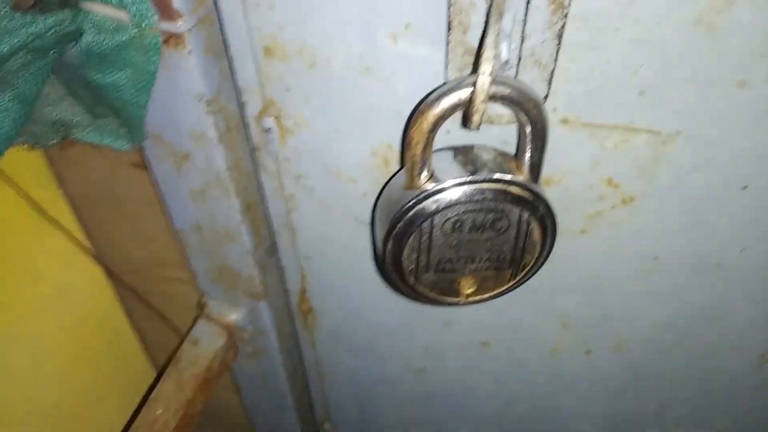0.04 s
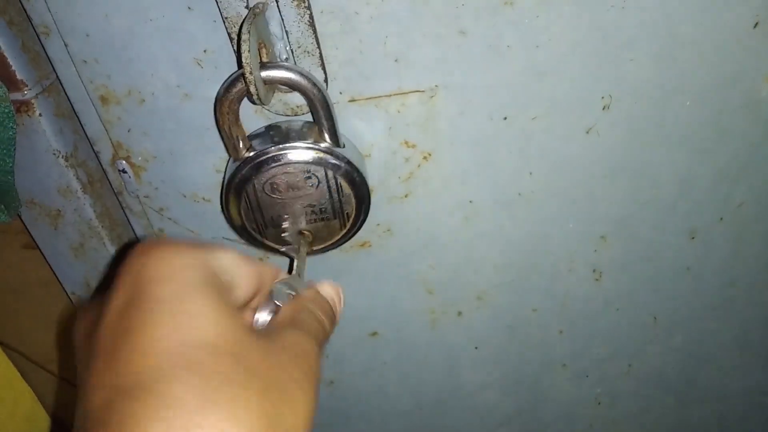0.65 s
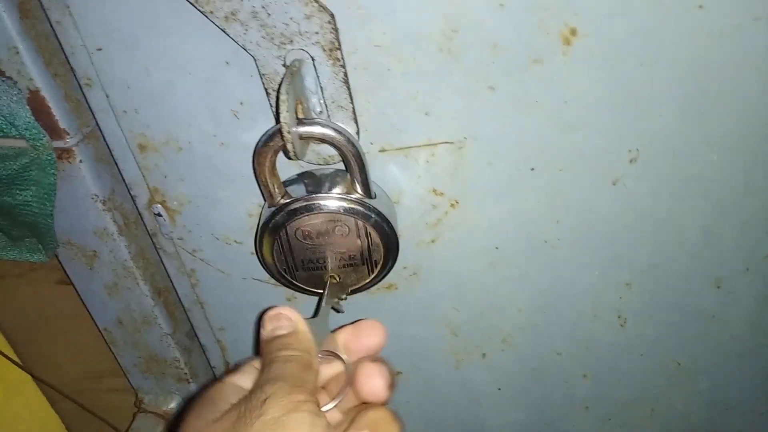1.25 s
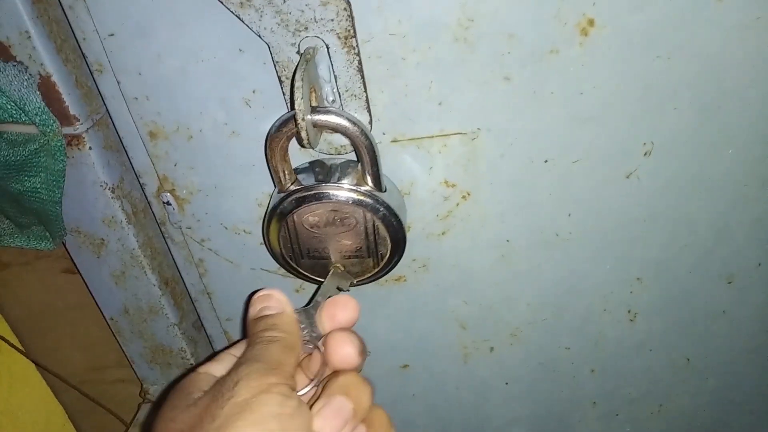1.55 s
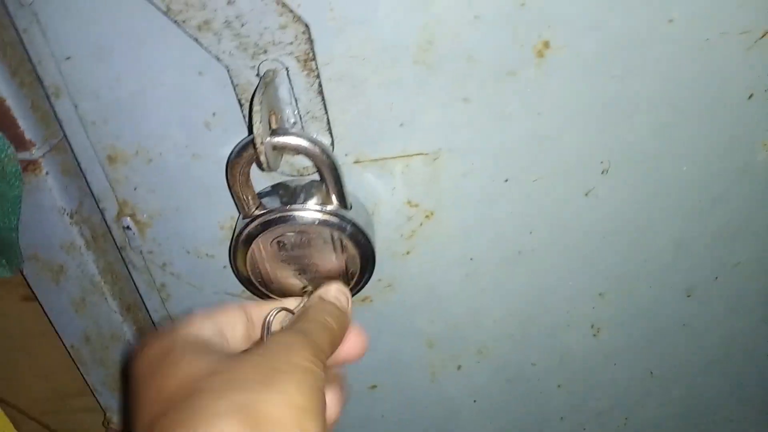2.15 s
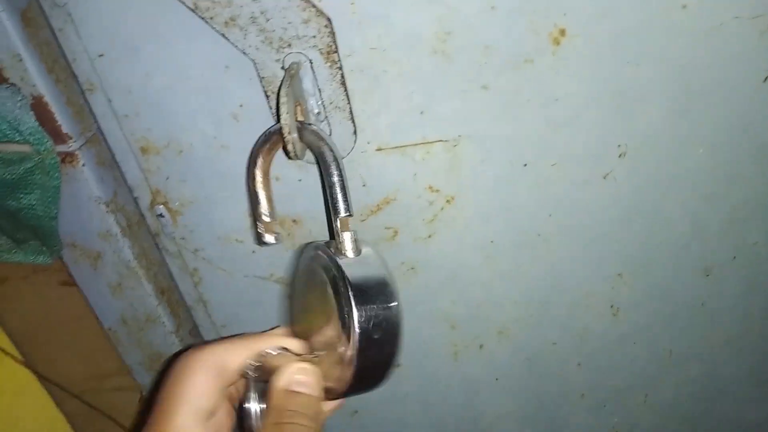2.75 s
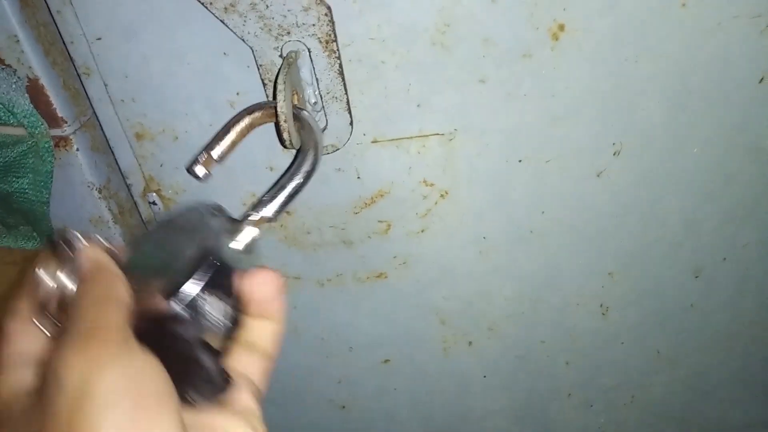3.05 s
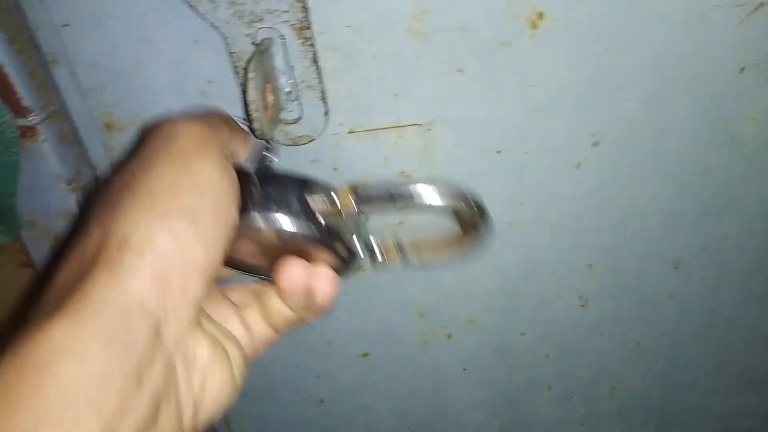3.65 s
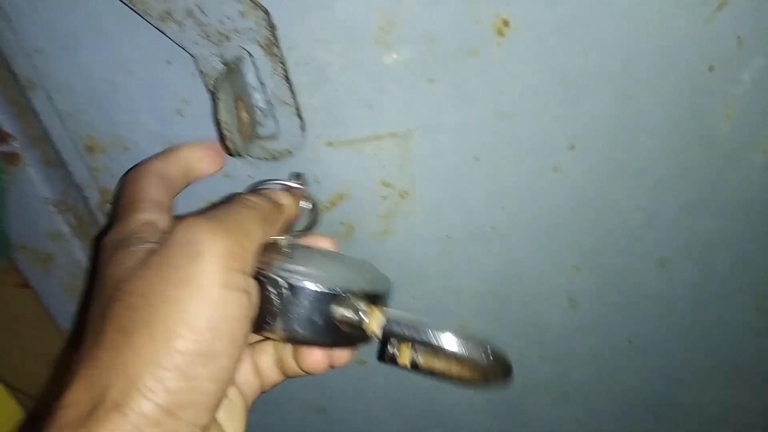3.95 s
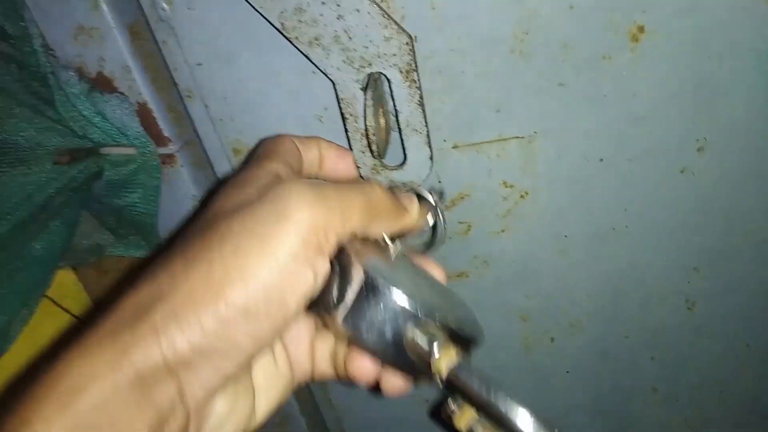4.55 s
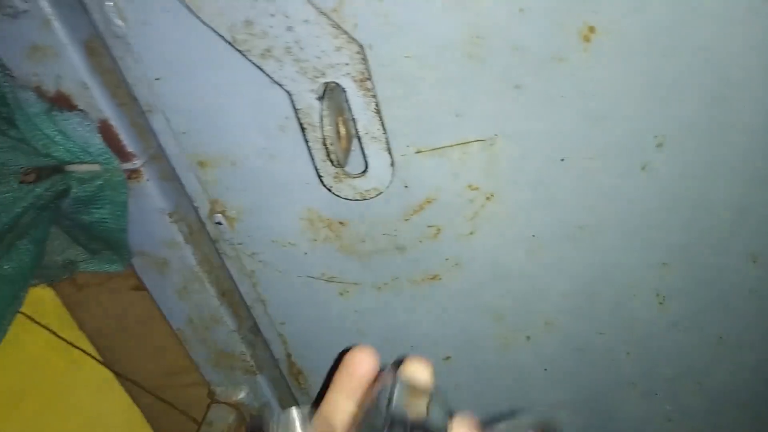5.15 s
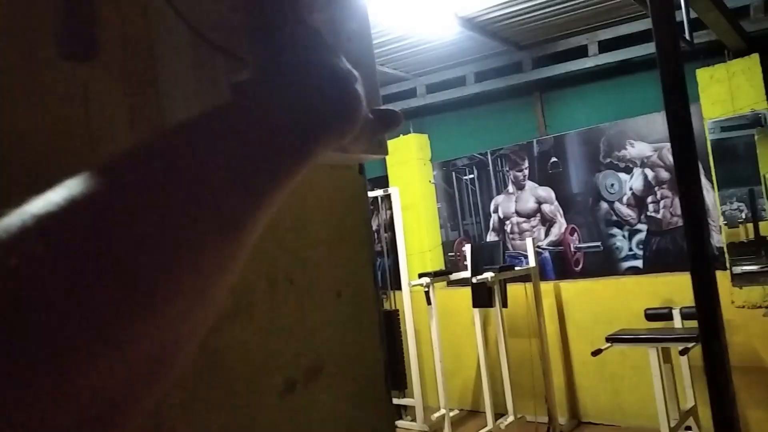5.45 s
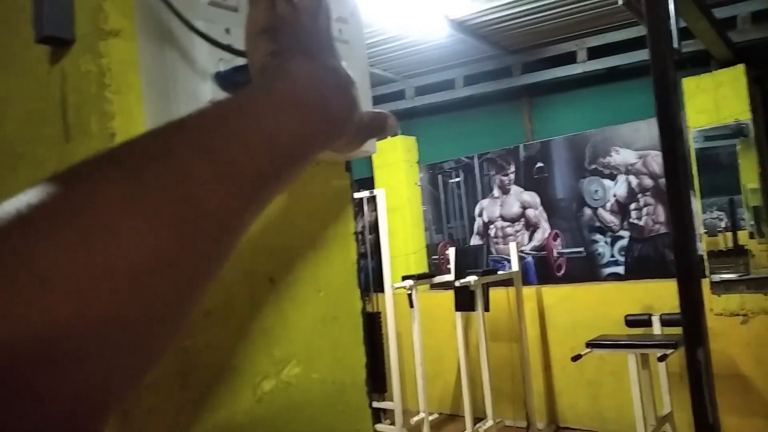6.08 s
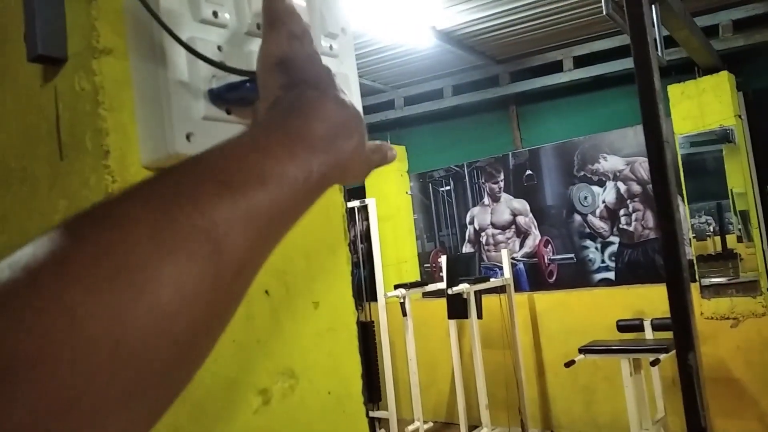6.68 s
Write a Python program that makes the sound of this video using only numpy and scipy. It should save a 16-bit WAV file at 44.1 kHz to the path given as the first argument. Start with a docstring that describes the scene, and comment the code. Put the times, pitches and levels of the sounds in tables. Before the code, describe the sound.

A key clicks in a padlock that knocks against a metal door and springs open; keys jingle, the hasp squeals, then two switches snap indoors.

```python
"""A steel padlock clicks as a key works it, knocking on the sheet-metal door it hangs from, which booms.
The shackle springs open, scrapes out of the staple and clanks on the hasp; loose keys jingle, the dry
hasp squeals as it sticks and slips, and the lock is set down. Then the outdoor air gives way to a hall
with a droning motor, where two sprung wall switches snap while a crow caws far off."""
import sys
import numpy as np
from scipy import signal
from scipy.fft import rfft, irfft, next_fast_len
from scipy.io import wavfile
from scipy.ndimage import map_coordinates

SR = 44100
rng = np.random.default_rng(int(sys.argv[2]) if len(sys.argv) > 2 else 0)


def generate_wav(sig):
    """Save sig (samples, or channels by samples) to the path in sys.argv[1] as 16-bit PCM at SR."""
    pcm = np.round(np.clip(np.atleast_2d(sig).T, -1, 1) * 32767).astype(np.int16)
    wavfile.write(sys.argv[1], SR, pcm)


N = 300762

# noise colours of the outdoor air and the opening rumble: freq_hz, density_db
AIR_SPECTRUM = [(50, -6.5), (354, -11), (581, -14), (14000, -27.5)]
RUMBLE_SPECTRUM = [(80, -11), (215, 1), (500, -32), (4000, -50)]
# fingers fumble and steel slides on steel: start_s, length_s, hiss_db
SLIDES = [(0.678, 0.2, -50.5), (1.957, 0.087, -52), (2.183, 0.1, -44.5), (2.401, 0.023, -40),
          (3.706, 0.078, -43), (5.035, 0.061, -51), (5.236, 0.083, -44.5), (5.41, 0.085, -44.5)]
# key and pins click in the lock: start_s, level_db
CLICKS = [(0.517, -22), (0.566, -29), (0.828, -17.5), (0.9231, -23.5), (1.1742, -30), (1.3071, -21.5),
          (1.331, -20), (1.7742, -7), (1.83, -20.5), (1.8471, -12.5), (1.93, -23.5), (1.985, -25.5),
          (2.047, -31.5), (2.1987, -23), (2.243, -22), (2.269, -14.5), (2.444, -13), (2.451, -11.5),
          (2.496, -19), (2.5017, -9), (2.8686, -15.5), (3.398, -28)]
# the lock's bright ring and the lower ring of its case: pitch_hz, level_db, t60_s
LOCK_MODES = [(5870, -12.5, 0.02), (8240, -4.5, 0.026), (12900, -19, 0.024)]
CASE_MODES = [(2793, 3, 0.023), (3050, -7, 0.038)]
# the key knocks against the lock's case, which rings briefly: start_s, level_db
CASE_TAPS = [(0.596, -30.5), (0.741, -32), (0.766, -23), (1.7754, -9.5)]
# reverb tail outside the door: freq_hz, t60_s
PORCH_T60 = [(3400, 0.59), (12000, 0.31)]
# the lock hits the door, softly with its body (0) or hard with its shackle: start_s, level_db, hardness
KNOCKS = [(0.7832, -22.5, 0), (1.388, -31.5, 0), (1.815, -32, 0), (2.442, -26.5, 0.58),
          (2.503, -12.5, 0.89), (2.545, -14, 0.6), (2.628, -15.5, 0.44)]
# colour of the struck door: freq_hz, density_db
DOOR_SPECTRUM = [(65, -25.5), (150, -6), (310, -2), (530, -0.5), (660, -8.5), (993, -8), (1640, -9.5),
                 (3480, -12.5), (4700, -17.5), (9000, -13.5), (14000, -23)]
# the door's ring-out: freq_hz, t60_s
DOOR_T60 = [(100, 1.23), (300, 2.19), (700, 1.067), (1800, 0.56), (4800, 0.49), (12800, 0.38)]
# the door's strongest modes: pitch_hz, boost_db
PANEL_MODES = [(233, 1), (462, 1.5), (1005, 8), (1442, 8.5)]
# the door sits left in the image: freq_hz, left_minus_right_db
DOOR_PAN = [(60, 4), (180, 6), (550, 0.5), (1650, 2), (4970, 5.5), (8500, 0.5)]
# envelope of the shackle dragging in the staple: time_s, level_db
DRAG_ENVELOPE = [(2.151, -51.5), (2.45, -37.5), (2.9, -40), (3.15, -52.5), (3.33, -40), (3.7, -52),
                 (4, -60)]
# the shackle strikes the hasp: start_s, level_db, relative_scrape_db
CLANKS = [(3.133, -47.5, -3), (3.29, -40, -3), (3.497, -36, 10), (3.555, -24, -10.5), (4.224, -57.5, -15)]
# colours of the hasp's clank and the door's soft thud: freq_hz, density_db
HASP_SPECTRUM = [(120, -55), (227, -24.5), (504, -10.5), (815, -10), (1100, 3), (1520, 2), (1850, -11.5),
                 (3630, -14.5), (14000, -32.5)]
THUD_SPECTRUM = [(60, -27), (145, -4), (230, -14.5), (500, -14), (800, -30.5), (5000, -44)]
# loose keys strike each other and the case: start_s, level_db, pitch_hz
JINGLES = [(3.6972, -11, 4450), (3.748, -37, 9600), (3.8696, -2, 7940), (4.683, -36.5, 5060),
           (4.756, -39.5, 8900), (4.843, -38.5, 10300), (4.9316, -28.5, 8200), (5.073, -35.5, 2300),
           (5.1615, -25.5, 3050), (5.21, -19, 2820), (5.256, -16, 3060), (5.307, -11.5, 4900),
           (5.453, -22.5, 3910), (5.4955, -8, 6180)]
# ring of a free-hanging key: pitch_hz, level_db, t60_s
KEY_MODES = [(6960, -8.5, 0.06), (8200, -4, 0.07), (9600, -12.5, 0.06), (13100, -6, 0.05)]
# the hand shifts the bunch a little: time_s, left_minus_right_db
KEYS_PAN = [(4.8, 7), (5.1, 5)]
# the hasp's two slips: start_s, rise_s, hold_s, level_db
SQUEALS = [(4.308, 0.084, 0.068, -13.7), (4.509, 0.016, 0.007, -16.5)]
# the squeal's glide: time_s, pitch_hz
SQUEAL_PITCH = [(4.338, 3560), (4.362, 3290), (4.395, 3377), (4.455, 3423), (4.53, 3336)]
# the squeal's bite: harmonic, level_db
SQUEAL_OVERTONES = [(2, 0), (3, -4), (4, -12)]
# a small clack as the lock is set down, then two switch snaps: start_s, level_db, hall_send_db
CLACKS = [(5.035, -28, -4.5), (5.545, -12.5, -5), (6.472, -12, 1.5)]
# the short ring of each clack: pitch_hz, width_hz, level_db
CLACK_MODES = [(1370, 127, 7.5), (2010, 70, 0), (2910, 134, 12), (4530, 1500, -29)]
# colour of the hall's answer to a clack: freq_hz, density_db
HALL_SPECTRUM = [(180, -67), (300, -7), (692, -22.5), (960, -5), (1820, 0.5), (2850, -0.5), (4920, -9),
                 (14000, -24)]
# the hall's reverb tail: freq_hz, t60_s
HALL_T60 = [(500, 0.44), (1500, 1), (4000, 0.82)]
# the crow's calls: start_s, length_s, level_db
CAWS = [(5.487, 0.11, -49), (5.692, 0.219, -50), (5.951, 0.22, -49.5)]
# the motor's drone: harmonic, level_db
MOTOR_HARMONICS = [(5, -66), (9, -66), (10, -63.5), (11, -65.5), (14, -67.5)]
# the hall's room tone: freq_hz, density_db
ROOM_TONE_SPECTRUM = [(50, -15), (120, -10), (286, -4.5), (504, -19.5), (2230, -15), (3320, -20.5),
                      (14000, -42)]
# stereo image of diffuse sound: freq_hz, left_right_correlation
STEREO_CORRELATION = [(220, 0.73), (600, 0.77), (1200, 0.15), (2200, 0.26), (5000, 0.029)]

DROPOUT_S, INDOORS_AT_S = (0.27, 0.345), 5.505


def amp(db):
    """Decibels to gain."""
    return 10 ** (np.asarray(db) / 20)


def unit(x):
    """x at rms 1."""
    return x / np.sqrt(np.mean(x ** 2) + 1e-20)


def clock(size):
    """Seconds for each sample."""
    return np.arange(size) / SR


def along(points, hz):
    """Read a curve on a log frequency axis."""
    freqs, values = np.transpose(points)
    return np.interp(np.log(hz + 1), np.log(freqs + 1), values)


def automation(points):
    """Breakpoints in time, drawn out to one value a sample."""
    return np.interp(clock(N), *np.transpose(points))


def during(start, end):
    """A gate, open between two times."""
    return (clock(N) >= start) & (clock(N) < end)


def wobble(rate):
    """A smooth random curve, rate knots a second."""
    return map_coordinates(rng.standard_normal(int(N * rate / SR) + 4), [np.arange(N) * rate / SR])


def filtered(x, response):
    """EQ x with a gain given as a function of frequency."""
    size = x.shape[-1]
    padded = next_fast_len(size + 8192)
    return irfft(rfft(x, padded) * response(np.fft.rfftfreq(padded, 1 / SR)), padded)[..., :size]


def highpass(x, hz, order=2):
    """Causal low cut."""
    return signal.sosfilt(signal.butter(order, hz, "high", fs=SR, output="sos"), x)


def resonance(hz, centre, width):
    """The gain of one resonant peak."""
    return 1 / np.sqrt(1 + ((hz - centre) / width) ** 2)


def add(track, start, sound):
    """Mix a sound in at start seconds."""
    part = track[..., round(start * SR):][..., :sound.shape[-1]]
    part += sound[..., :part.shape[-1]]


def placed(x, lag_ms, pan_db):
    """Pan a close source: the left side is later by lag_ms and louder by pan_db."""
    left = filtered(x, lambda hz: np.exp(-1j * np.pi * hz * lag_ms / 1000))
    right = filtered(x, lambda hz: np.exp(1j * np.pi * hz * lag_ms / 1000))
    return np.array([left * amp(pan_db / 2), right * amp(-pan_db / 2)])


def diffuse(spectrum, size):
    """Stereo noise of rms 1, narrow in the bass and wide in the treble."""
    def mid_side_gains(hz):
        angle = np.arccos(along(STEREO_CORRELATION, hz)) / 2
        return amp(along(spectrum, hz)) * [np.cos(angle), np.sin(angle)]
    mid, side = filtered(rng.standard_normal((2, size)), mid_side_gains)
    return unit(np.array([mid + side, mid - side]))


def fade(t, t60):
    """Exponential decay; 1 - fade makes an attack."""
    return 10 ** -np.minimum(3 * t / t60, 12)


def ring_out(x, t60):
    """Each frequency fades at its own speed."""
    hz, t, bands = signal.stft(x, SR, nperseg=256)
    bands = bands * amp(-60 * t / along(t60, hz)[:, None])
    return signal.istft(bands, SR, nperseg=256)[1][:, :x.shape[-1]]


def reverb(x, t60):
    """The diffuse answer of the walls to a mono sound."""
    tail = ring_out(rng.standard_normal((2, SR)), t60)
    return signal.fftconvolve(x[None], tail / np.linalg.norm(tail[0]), axes=1)[:, :N]


def ring(modes, t, scatter_db):
    """Struck modes, their strengths scattered anew on each hit."""
    return sum(amp(db + scatter_db * rng.normal()) * fade(t, t60)
               * np.sin(2 * np.pi * (hz * t + rng.random())) for hz, db, t60 in modes)


def steel_colour(spacing_hz, strong_modes=(), spread_db=3.7):
    """The EQ of a steel part: modes of random strength, with any strong ones boosted."""
    grid = np.arange(0, SR / 2, spacing_hz)
    db = spread_db * np.clip(rng.standard_normal(len(grid)), -2, 2)
    db += sum(boost * resonance(grid, hz, spacing_hz) ** 2 for hz, boost in strong_modes)
    return lambda hz: np.interp(hz, grid, unit(amp(db)))


def crack(t, low_hz, t60):
    """The bright transient of one contact; each touches another spot and has its own colour."""
    return filtered(highpass(rng.standard_normal(len(t)), low_hz), steel_colour(300)) * fade(t, t60)


def chatter(x, t60, share):
    """Hard parts never meet cleanly: a spray of tiny rebounds follows the contact."""
    t = clock(SR // 20)
    hits = rng.standard_normal(len(t)) * (rng.random(len(t)) < .06) * fade(t, t60)
    hits *= share / np.linalg.norm(hits)
    hits[0] = 1
    return signal.fftconvolve(x, hits / np.linalg.norm(hits))[:len(x)]


def outdoor_air():
    """A bed of still air that opens with a low rumble and one bump."""
    rumble = amp(-54.5) * diffuse(RUMBLE_SPECTRUM, N) * amp([[3], [-3]]) * during(0, DROPOUT_S[0])
    t = clock(SR // 10)
    add(rumble, .227, amp(-33.5) * np.cos(2 * np.pi * 350 * t) * fade(t, 0.01))
    return rumble + amp(-59) * diffuse(AIR_SPECTRUM, N) * during(0, INDOORS_AT_S)


def steel_slide(scrape_s=0.11, scrape_db=-38.5):
    """Sliding steel hisses in tiny catches that excite lock and case; the key scrapes at each click."""
    def lock_colour(hz):
        case = amp(-1) * resonance(hz, CASE_MODES[0][0], 150)
        return case + sum(amp(db) * resonance(hz, mode, 480) for mode, db, _ in LOCK_MODES)
    pressure = np.zeros(N)
    key_scrapes = [(start - scrape_s / 2, scrape_s, db + scrape_db) for start, db in CLICKS]
    for start, length, db in SLIDES + key_scrapes:
        add(pressure, start, amp(db) * np.sin(np.linspace(0, np.pi, int(length * SR))))
    catches = unit(amp(4.5 * wobble(330) + 3.5 * wobble(60)) * rng.standard_normal((2, N)))
    return pressure * unit(filtered(highpass(catches, 1500), lock_colour))


def padlock(case_hz=2760, ticks_per_s=70):
    """Pins and key click, sliding steel ticks, and the heavy case adds a short, lower ring."""
    out, t = np.zeros(N), clock(SR // 4)
    for start, db in CLICKS:
        steel = .15 * ring(LOCK_MODES, t * (1 + .04 * rng.normal()), scatter_db=4)
        steel += .45 * crack(t, 2900, .024)
        body = ring(CASE_MODES, t * (1 + .012 * rng.normal()), scatter_db=3) * fade(t, .035)
        click = amp(db) * steel + amp(-20 + 0.43 * db) * body  # louder clicks are brighter
        add(out, start, chatter(click, t60=0.035, share=0.45) * (1 - fade(t, 0.007)))
    for start, length, db in SLIDES:
        for tick_s in rng.uniform(start, start + length, round(length * ticks_per_s)):
            add(out, tick_s, amp(db + 6) * crack(t, 2500, .015))
    case = np.sin(2 * np.pi * case_hz * t) * fade(t, 0.03)
    for start, db in CASE_TAPS:
        add(out, start, amp(db) * chatter(case, t60=0.055, share=0.58) * (1 - fade(t, 0.011)))
    for start, db, _ in KNOCKS[:3]:  # while it is shut, the case rings when it hits the door
        add(out, start, amp(db + 12.5) * case * (1 - fade(t, 0.0012)))
    return placed(out, lag_ms=.13, pan_db=8) + amp(-16.5) * reverb(out, PORCH_T60)


def door_knocks(panel, boom_hz=720, rattle_hz=4200):
    """The sheet has countless modes: soft knocks boom in the low ones, hard ones rattle the fittings."""
    out, t = np.zeros((2, N)), clock(SR + SR // 2)
    for start, db, hardness in KNOCKS:
        sheet = filtered(diffuse(DOOR_SPECTRUM, len(t)), panel)
        boom = filtered(sheet, lambda hz: 1 / (1 + (hz / boom_hz) ** 10))
        rattle = filtered(sheet, lambda hz: 1 - 1 / (1 + (hz / rattle_hz) ** 10))
        clang = sheet - boom - rattle
        boom_db, rattle_db = -6.5 - 22.5 * hardness, -28.5 + 31.5 * hardness ** 2
        knock = amp(boom_db) * unit(boom) + amp(-6) * unit(clang) + amp(rattle_db) * unit(rattle)
        add(out, start, amp(db) * ring_out(knock, DOOR_T60) * (1 + 0.47 * fade(t, 1.0)))
    return out


def shackle_drag():
    """The shackle catches and slips in the staple, and the door murmurs with it."""
    murmur = unit(filtered(diffuse(DOOR_SPECTRUM, N), lambda hz: 1 / (1 + (hz / 2600) ** 2)))
    level = amp(automation(DRAG_ENVELOPE) + 0.76 * wobble(45))
    return murmur * level * during(DRAG_ENVELOPE[0][0], DRAG_ENVELOPE[-1][0])


def hasp_clanks(scrape_hz=2800, push_s=4.455):
    """The hasp clanks and the shackle grates on it; later a finger pushes it and the door thuds."""
    out, t = np.zeros((2, N)), clock(SR)
    plate = steel_colour(60)
    for start, db, scrape_db in CLANKS:
        clank = ring_out(diffuse(HASP_SPECTRUM, len(t)), DOOR_T60)
        clank *= (0.65 + 1.6 * fade(t, 0.085)) * (1 - fade(t, 0.014))
        grit = rng.standard_normal((2, len(t))) * amp(6 * wobble(400)[:len(t)])
        scrape = unit(filtered(grit, lambda hz: plate(hz) * resonance(hz, scrape_hz, 1300) ** 3))
        scrape *= fade(t, 0.63) * (1 - fade(t, 0.013))
        add(out, start, amp(db) * (clank + .5 * amp(scrape_db) * scrape))
    thud = diffuse(THUD_SPECTRUM, len(t)) * fade(t, 1.36) * (1 - fade(t, 0.046))
    add(out, push_s, amp(-42.5) * thud)
    return out


def key_jingle(swinging_s=(3.8, 4), rebound_s=0.013, rebound_db=-7):
    """Thin keys chink and rebound, each hit with its own note; fingers damp them unless they swing."""
    out, t = np.zeros(N), clock(SR // 3)
    for start, db, note_hz in JINGLES:
        damping, contacts = (1, 4) if swinging_s[0] < start < swinging_s[1] else (3, 2)
        modes = [(hz, level, t60 / damping) for hz, level, t60 in KEY_MODES]
        for k in range(contacts):
            chink = 0.13 * ring(modes, t * (1 + .015 * rng.normal()), scatter_db=2)
            chink += 0.38 * crack(t, 6000, 0.028)
            note = filtered(rng.standard_normal(len(t)), lambda hz: resonance(hz, note_hz, 380) ** 2)
            clatter = highpass(crack(t, 1500, 0.045), 1300)
            strike = chink + amp(-12) * unit(note) * fade(t, 0.031) + amp(-14) * clatter
            strike = chatter(strike, t60=0.022, share=0.2) * (1 - fade(t, 0.005))
            add(out, start + k * rebound_s / damping, amp(db + k * rebound_db) * strike)
    return placed(out, lag_ms=0.11, pan_db=automation(KEYS_PAN)) + amp(-24) * reverb(out, PORCH_T60)


def hasp_squeal(swell_db=37, release_s=0.023, grip_s=0.018, echo_s=0.021):
    """Stick-slip in the dry hasp: each slip swells, holds and lets go; the louder, the more bite."""
    hz = automation(SQUEAL_PITCH)
    level, t = np.zeros(N), clock(SR // 2)
    for start, rise, hold, db in SQUEALS:
        swell = amp(-swell_db * np.maximum(1 - t / rise, 0) ** 2)
        release = fade(np.maximum(t - rise - hold, 0), release_s)
        add(level, start, amp(db) * swell * release)
    phase = 2 * np.pi * np.cumsum(hz * (1 + .0033 * wobble(240) + .002 * wobble(1100))) / SR
    step = 1 / (grip_s * SR)
    grip = signal.lfilter([step], [1, step - 1], level)  # the overtones take time to build
    bite = amp(15) * np.minimum(grip, level) ** 1.47
    overtones = sum(amp(db) * np.sin(k * phase) for k, db in SQUEAL_OVERTONES)
    squeal = (np.sin(phase) + bite * overtones) * level * amp(2.3 * wobble(170))
    squeal += amp(-39) * level * highpass(rng.standard_normal(N), hz.mean())  # the dry faces hiss
    squeal += amp(-11) * np.roll(squeal, round(echo_s * SR))  # slapback off a near wall
    return placed(squeal, lag_ms=0.12, pan_db=10.5) + amp(-11) * reverb(squeal, PORCH_T60)


def set_down_and_switches():
    """The lock is set down with a small clack, then two sprung switches snap; the hall answers each."""
    out, t = np.zeros((2, N)), clock(SR)
    modes = [(hz, db, np.log(1000) / (np.pi * width)) for hz, width, db in CLACK_MODES]
    for start, db, send_db in CLACKS:
        body = 0.58 * ring(modes, t, scatter_db=0)
        burst = 0.25 * highpass(rng.standard_normal(len(t)), 800) * fade(t, 0.039)
        clack = highpass(chatter(body + burst, t60=.02, share=.6), 750, order=4)
        hall = ring_out(diffuse(HALL_SPECTRUM, len(t)), HALL_T60)
        add(out, start, amp(db) * (placed(clack, lag_ms=.2, pan_db=4) + amp(send_db - 17.5) * hall))
    return out


def crow(pitch_hz=470, throat_hz=1400, width_hz=190):
    """Far, hoarse caws: only the strongest throat resonance carries."""
    out = np.zeros(N)
    for start, length, db in CAWS:
        arch = np.sin(np.linspace(0, np.pi, int(length * SR)))
        phase = 2 * np.pi * np.cumsum(pitch_hz * (1 + 0.063 * (arch - .7))) / SR
        rasp = np.maximum(np.cos(phase), 0) ** 2 * (1 + 6 * rng.standard_normal(len(arch)))
        voice = filtered(rasp, lambda hz: resonance(hz, throat_hz, width_hz) ** 4)
        add(out, start, amp(db) * unit(voice) * arch)
    return out + reverb(out, HALL_T60)


def hall_motor(rotation_hz=26.8):
    """A motor drones on harmonics of its slightly wavering speed, over the hall's room tone."""
    turns = np.cumsum(rotation_hz * (1 + 0.0022 * wobble(5.9))) / SR
    drone = sum(amp(db) * np.sin(2 * np.pi * (k * turns + rng.random())) for k, db in MOTOR_HARMONICS)
    room_tone = amp(-57) * diffuse(ROOM_TONE_SPECTRUM, N)
    return (drone + room_tone) * during(INDOORS_AT_S, N / SR)


def scene():
    """The stereo mix; knocks, clanks and drag all ring the same door panel."""
    panel = steel_colour(11, PANEL_MODES)
    door = door_knocks(panel) + filtered(hasp_clanks() + shackle_drag(), panel)
    door = filtered(door, lambda hz: amp(along(DOOR_PAN, hz) * np.array([[.5], [-.5]])))
    hardware = padlock() + steel_slide() + key_jingle() + hasp_squeal()
    return door + hardware + set_down_and_switches() + crow() + hall_motor() + outdoor_air()


def record(dry, low_cut_hz=84, notch_hz=7350, top_hz=14400):
    """Small microphones round the peaks, trim bass and top and notch the treble; one brief dropout."""
    heard = highpass(np.tanh(dry), low_cut_hz) * ~during(*DROPOUT_S)
    heard = filtered(heard, lambda hz: 1 - .7 * resonance(hz, notch_hz, 420) ** 4)
    return filtered(heard, lambda hz: 1 / np.sqrt(1 + (hz / top_hz) ** 170))


dry = scene()
out = record(dry)
generate_wav(out)
```